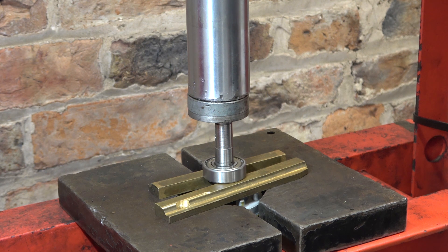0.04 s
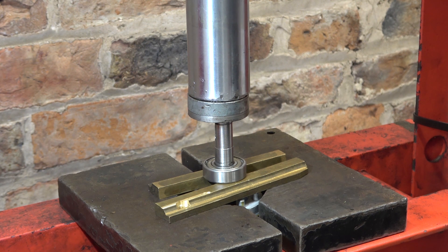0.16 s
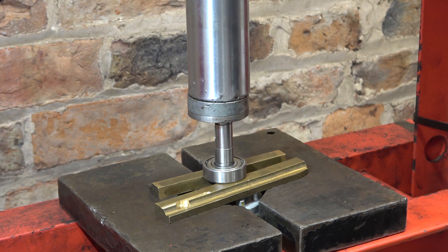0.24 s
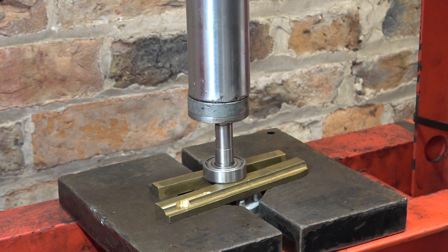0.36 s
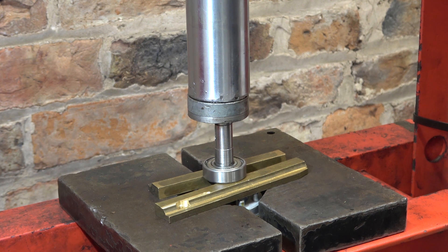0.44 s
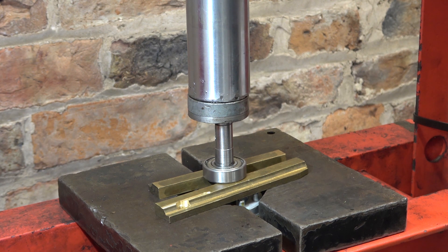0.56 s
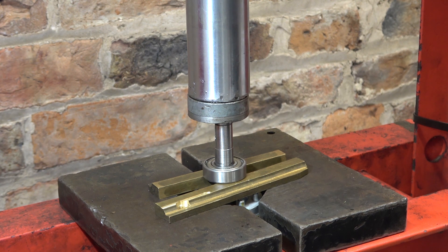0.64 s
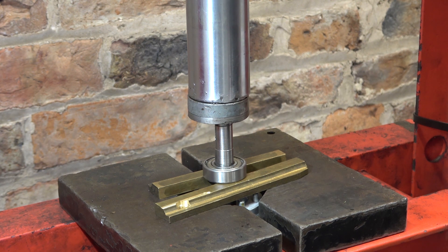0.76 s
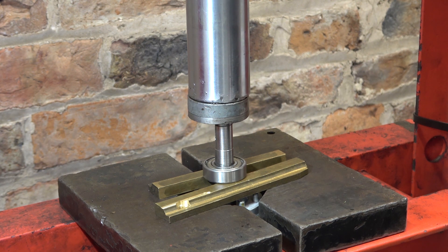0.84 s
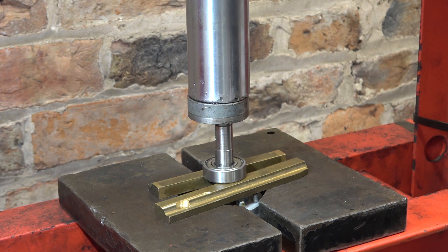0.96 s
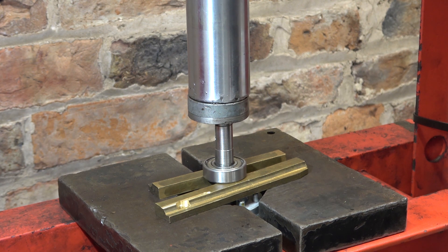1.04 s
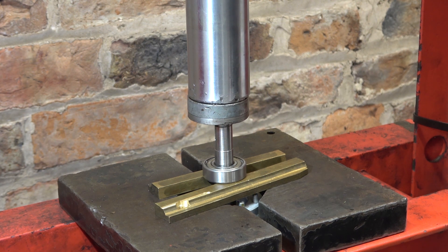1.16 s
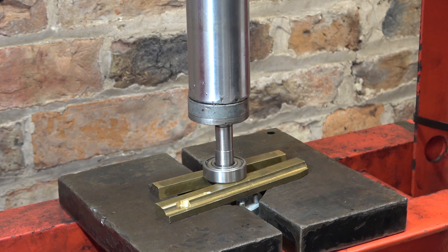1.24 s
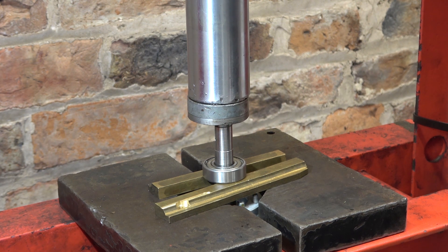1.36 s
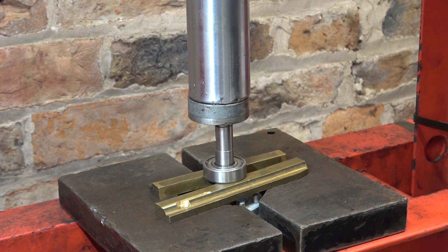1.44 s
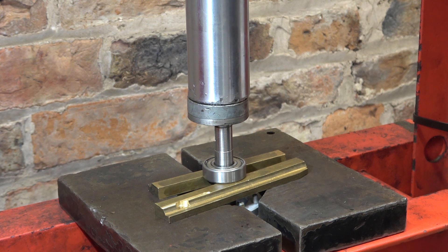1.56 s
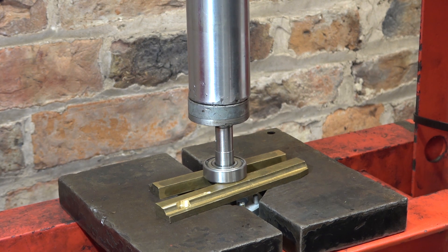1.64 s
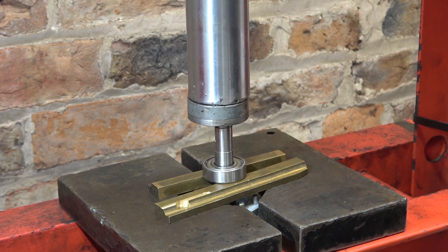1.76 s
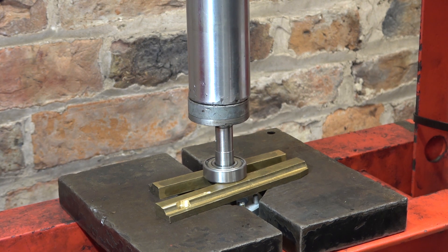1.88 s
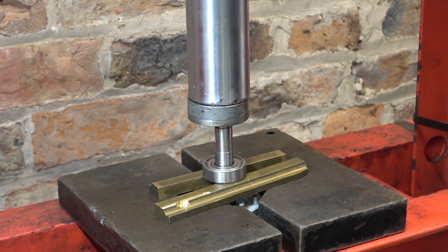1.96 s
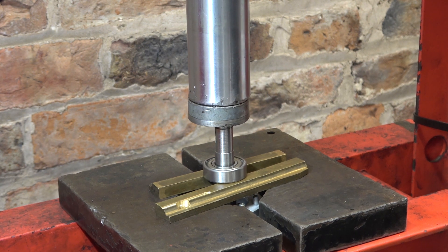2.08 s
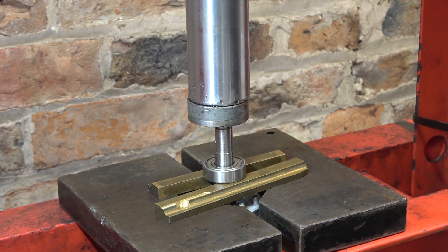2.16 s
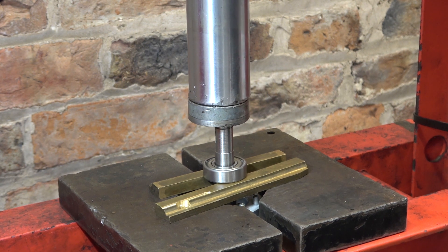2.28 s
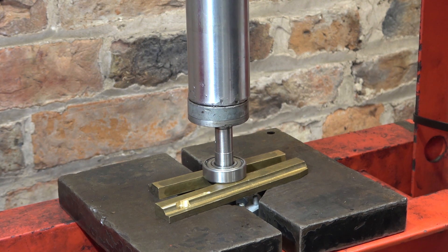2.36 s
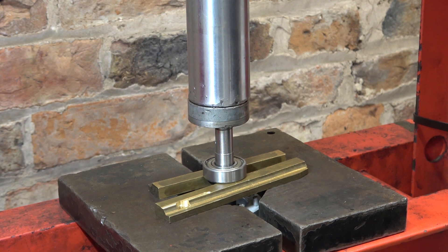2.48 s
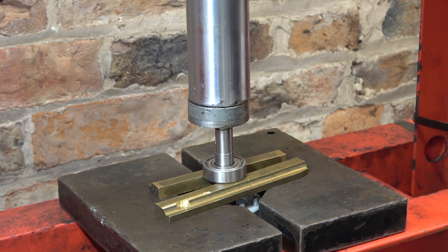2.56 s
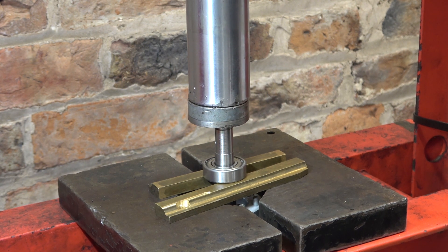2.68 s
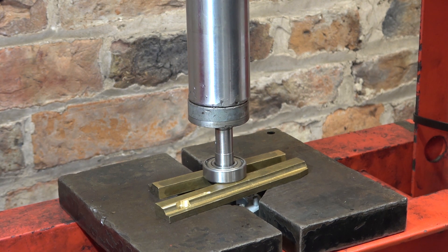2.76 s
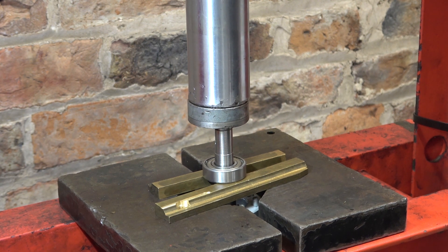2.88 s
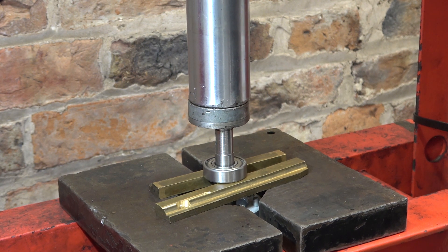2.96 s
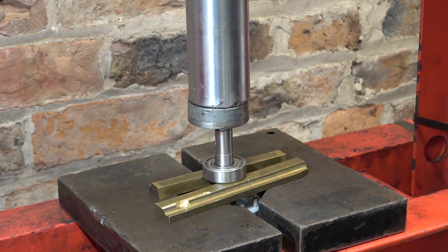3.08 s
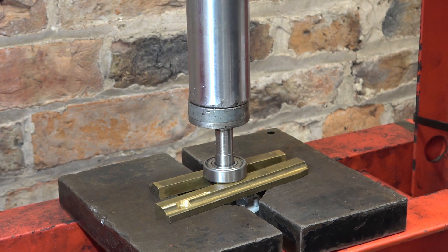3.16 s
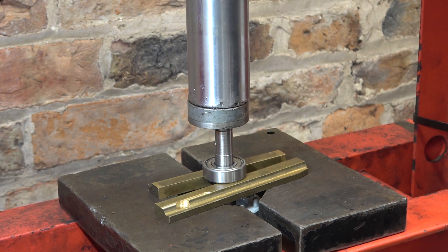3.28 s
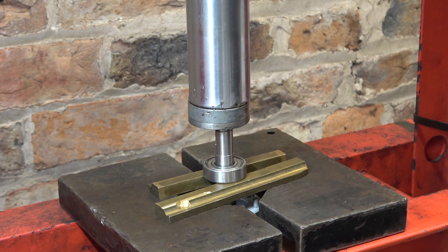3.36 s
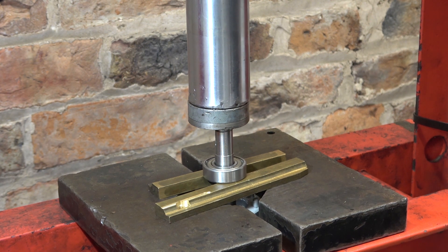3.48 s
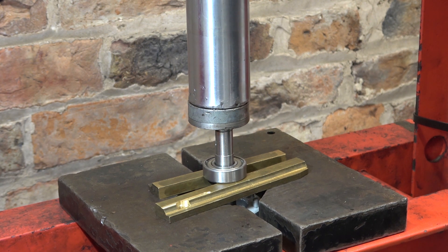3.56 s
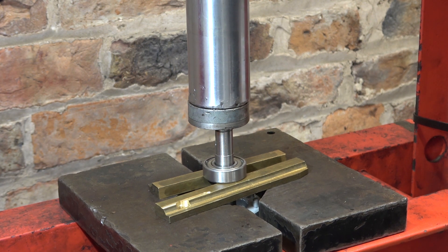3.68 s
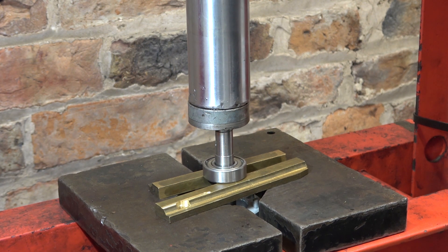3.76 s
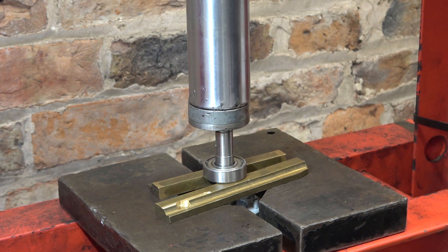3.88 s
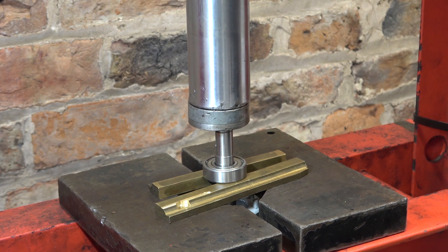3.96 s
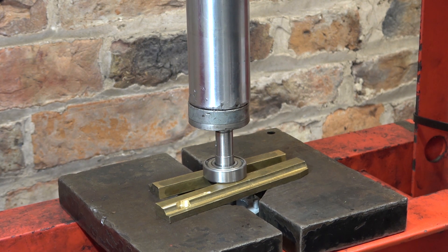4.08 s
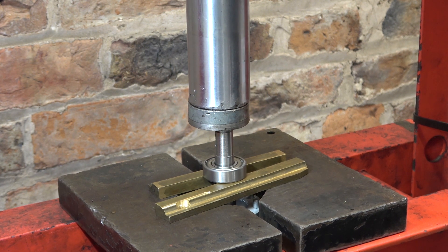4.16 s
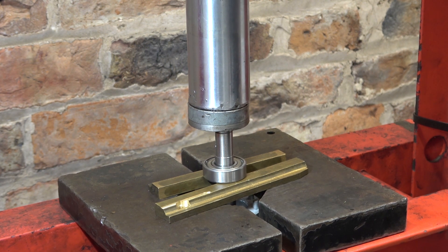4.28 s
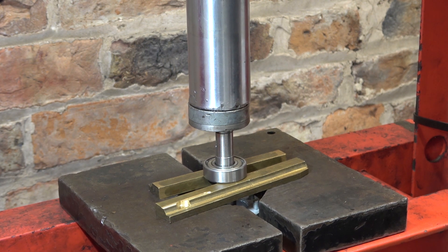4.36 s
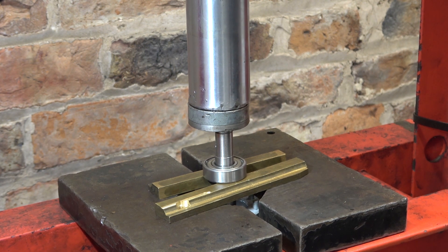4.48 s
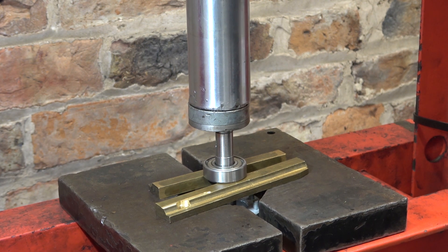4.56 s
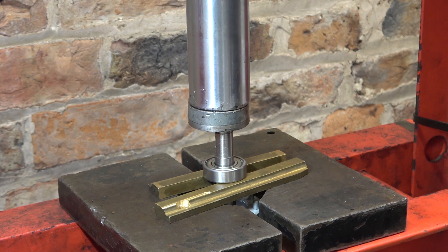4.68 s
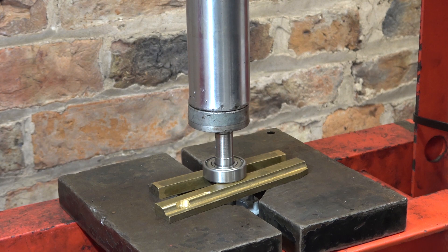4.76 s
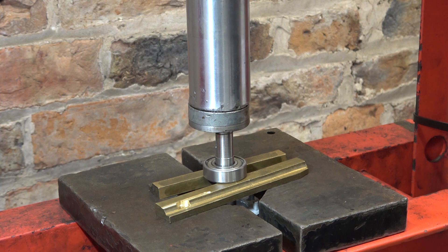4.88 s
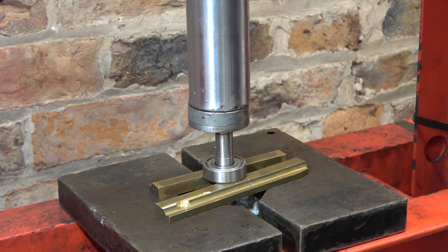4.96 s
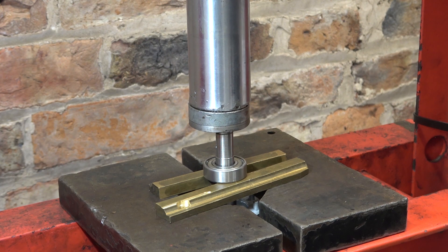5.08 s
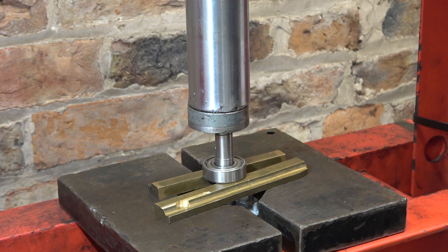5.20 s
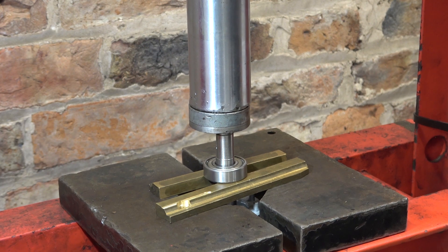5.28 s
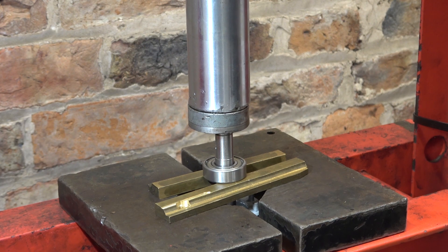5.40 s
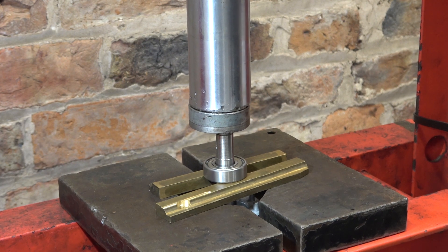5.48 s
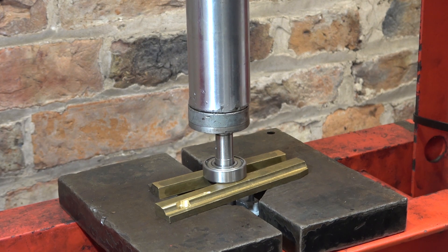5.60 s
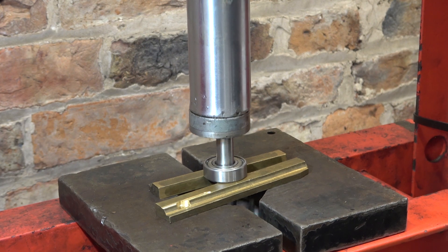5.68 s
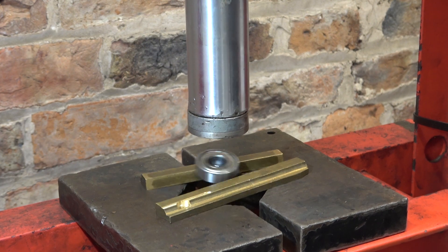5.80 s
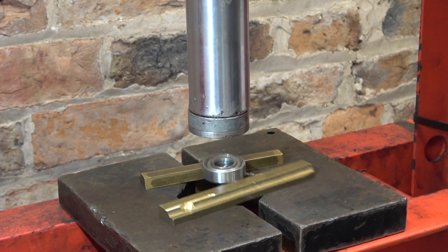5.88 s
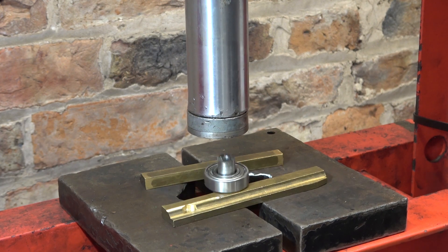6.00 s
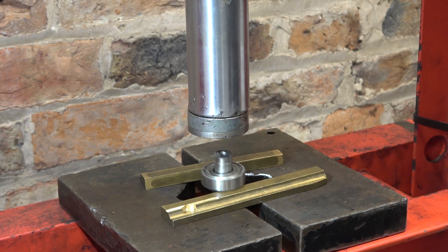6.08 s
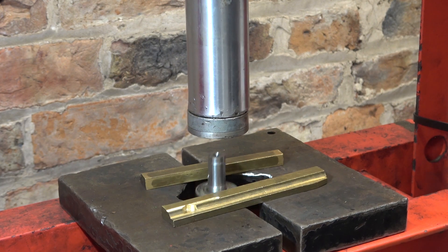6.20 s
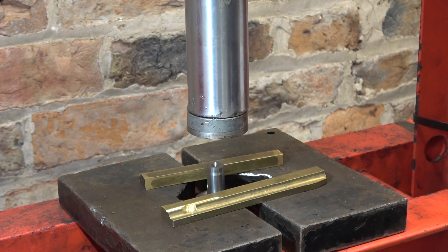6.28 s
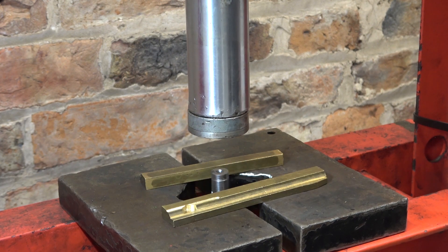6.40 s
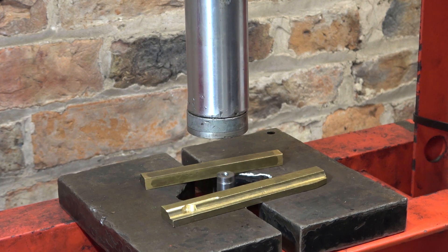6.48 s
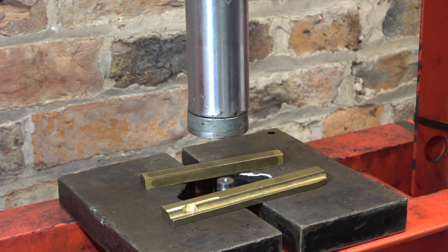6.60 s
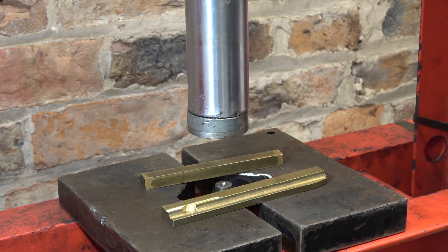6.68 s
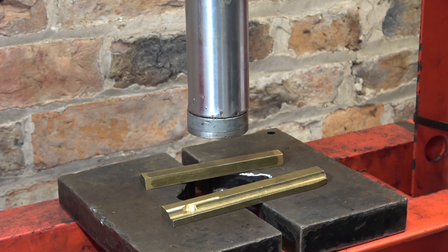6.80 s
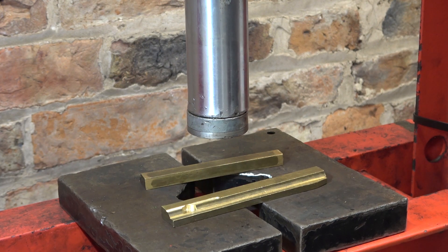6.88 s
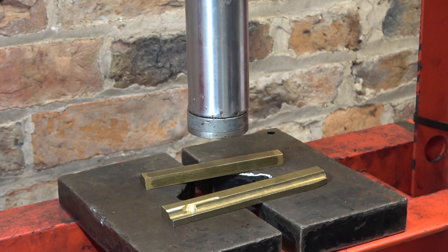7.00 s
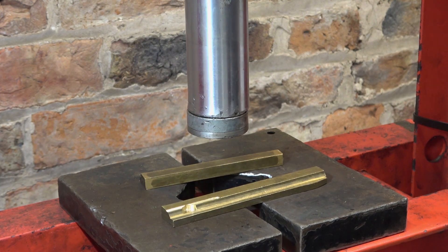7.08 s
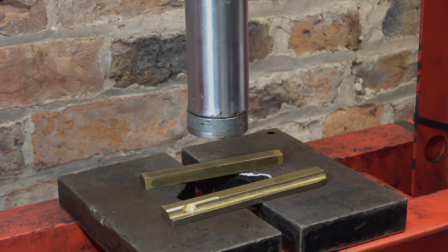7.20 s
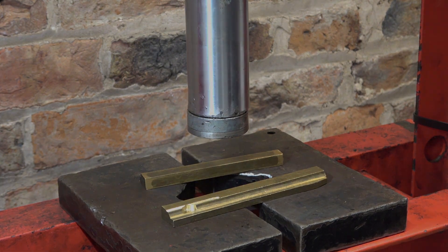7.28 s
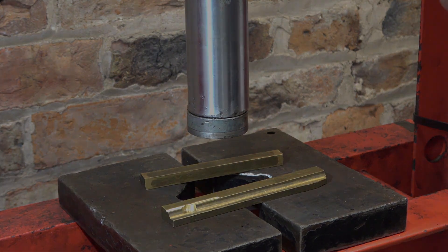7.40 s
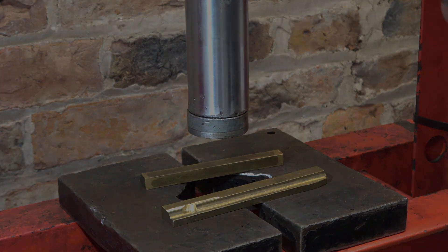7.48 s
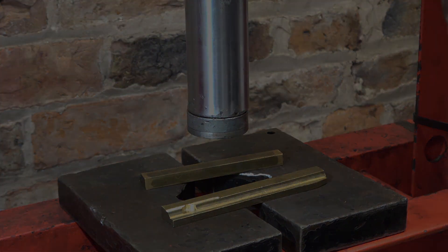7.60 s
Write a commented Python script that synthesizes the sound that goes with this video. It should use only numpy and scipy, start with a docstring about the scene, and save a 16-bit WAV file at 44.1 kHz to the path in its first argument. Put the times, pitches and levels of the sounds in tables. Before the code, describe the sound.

Near microphone, lively hard room: thirteen steady pumping strokes, each a cluster of dry metallic clicks followed by a dull frame thud, the thuds weakening while the clacks continue. Low bumps come through the floor. A sudden bang overloads the microphone, with clanging plates and a short upward-gliding ring. Light bright clinks and a hard low thump follow, then one faint tap and fading quiet.

```python
"""A hand-pumped press in a hard-walled workshop, heard by a near microphone. The lever thuds into the steel frame at
each stroke's end, over a low floor rumble; its loose linkage clacks, made of banded noise bursts and mode resonators.
Then the shaft breaks free with a crack that overloads the microphone: the bed plates ring, one mode gliding upward,
the freed bearing and falling shaft clink, the shaft lands under the bed. Decaying noise makes the room's reply
throughout; the end fades."""
import sys
import numpy as np
from scipy import signal
from scipy.fft import rfft, irfft
from scipy.io import wavfile
from scipy.ndimage import uniform_filter1d

SR = 44100
rng = np.random.default_rng(int(sys.argv[2]) if len(sys.argv) > 2 else 0)


def store_pcm(level_fs):
    """Save levels as 16-bit WAV."""
    pcm = np.round(np.clip(level_fs, -1, 1) * 32767).astype(np.int16)
    wavfile.write(sys.argv[1], SR, np.atleast_2d(pcm).T)


N = 337183  # length in samples
CRACK_S = 5.7385  # the shaft lets go


def undb(db):
    """Decibels to an amplitude factor."""
    return 10 ** (np.asarray(db) / 20)


def level(x, db):
    """Scale x to an RMS level in dB."""
    return x * undb(db) / np.sqrt(np.mean(x ** 2))


def band(x, lo_hz, hi_hz):
    """Keep the band between two frequencies."""
    return signal.sosfilt(signal.butter(2, [lo_hz, min(hi_hz, .45 * SR)], "band", fs=SR, output="sos"), x)


def colour(x, points):
    """Shape the spectrum of x by (Hz, dB) points, joined on a log frequency scale."""
    hz, db = np.transpose(points)
    f = np.maximum(np.arange(len(x) // 2 + 1) * SR / len(x), 1)
    gain = undb(np.interp(np.log(f), np.log(hz), db))
    return irfft(rfft(x) * gain, len(x))


def ring(x, modes):
    """Sum of decaying two-pole resonators driven by x."""
    out = np.zeros(len(x))
    for hz, db, t60 in modes:
        decay = np.log(1000) / (max(t60, .01) * SR)
        pole = np.exp(2j * np.pi * hz / SR - decay)
        out += undb(db) * signal.lfilter([0, pole.imag], [1, -2 * pole.real, abs(pole) ** 2], x)
    return out


def struck(x, modes, detune, spread_db):
    """One blow on loose parts: they sit differently each time, so pitch and strength of every mode scatter."""
    chance = rng.standard_normal((len(modes), 2))
    scattered = [(hz * (1 + detune * a), db + spread_db * b, t60)
                 for (hz, db, t60), (a, b) in zip(modes, chance)]
    return ring(x, scattered)


def burst(ms, rise_ms, grain_db=3):
    """Rattling contact: grainy noise that rises fast and dies with time constant ms."""
    t_ms = np.arange(8192) / SR * 1000
    shape = (1 - np.exp(-t_ms / rise_ms)) * np.exp(-t_ms / max(ms, .3))
    grain = undb(grain_db * np.repeat(rng.standard_normal(128), 64))
    x = shape * grain * rng.standard_normal(len(t_ms))
    return x * np.sqrt(np.sum(shape ** 2) / np.sum(x ** 2))


def push(ms):
    """A smooth contact force of unit impulse, ms long."""
    t_ms = np.arange(512) / SR * 1000
    force = np.sin(np.pi * np.clip(t_ms / ms, 0, 1)) ** 2
    return force / force.sum()


def add(track, s, x):
    """Lay x into the track from s seconds on."""
    i = int(s * SR)
    track[i:i + len(x)] += x[:N - i]


# The lever landing on the frame at each stroke's end. Each row: start in seconds, relative level in dB.
LANDINGS = [(0.0, -17), (0.304, -6.5), (0.731, -8.5), (1.167, -7.5), (1.589, -9.5), (2.007, -10.5),
            (2.434, -14), (2.886, -13.5), (3.322, -14.5), (3.787, -18), (4.252, -20.5), (4.721, -22.5),
            (5.192, -24)]
# Modes of the steel frame. Each row: frequency in Hz, relative level in dB, 60 dB decay time in seconds.
FRAME_MODES = [(158, -3, 0.12), (272, -11, .07), (293, -2, 0.11), (430, -0.5, 0.04), (633, 10.5, 0.017),
               (720, -4, 0.03), (962, -16.5, 0.045)]
CHATTER_MS, CHATTER_SCATTER_MS, CHATTER_DB = 4.1, 0.47, -2.5


def lever_landings():
    """The landing lever chatters four times on its stop, driving the frame's modes, with a dull thud of noise."""
    thud, into_frame = np.zeros((2, N))
    for s, db in LANDINGS:
        for k, jitter in enumerate(rng.uniform(-1.1, 1, size=4)):
            late_ms = max(k * CHATTER_MS + jitter * CHATTER_SCATTER_MS, 0)
            add(into_frame, s + late_ms / 1000, undb(db + CHATTER_DB) * push(0.88))
        add(thud, s, undb(db + 5.5) * band(burst(19, 2.7), 290, 1100))
    return thud + undb(-8.0) * band(ring(into_frame, FRAME_MODES), 100, 2700)


# How long the hard walls hold the sound. Each row: frequency in Hz, 60 dB decay time in seconds.
ROOM_DECAY = [(60, 0.45), (300, 0.66), (1000, 0.99), (3000, 0.91), (7000, 0.39), (10000, 0.17),
              (14000, 0.1)]


def room(x):
    """Dense reflections: noise in half-octave bands, each dying at its own rate."""
    t = np.arange(SR) / SR
    hz, t60 = np.transpose(ROOM_DECAY)
    tail = np.zeros(SR)
    for f in 45 * 2 ** np.arange(0, 9, .5):
        band_t60 = np.interp(np.log(f), np.log(hz), t60)
        tail += band(rng.standard_normal(SR), f / 2 ** .25, f * 2 ** .25) * undb(-60 * t / band_t60)
    tail *= 1 - np.exp(-t / 0.0044)  # reflections build up over the first milliseconds
    return signal.fftconvolve(x, tail / np.sqrt(np.sum(tail ** 2)))[:N]


# The press rocking on the floor while pumped. Each row: time in seconds, relative level in dB.
RUMBLE_LEVEL = [(0.0, -60), (1.08, -51), (6.012, -49.5), (6.5, -65.5)]
# Dull bumps through the floor. Each row: start in seconds, level in dB, starting pitch in Hz, length in cycles.
FLOOR_BUMPS = [(1.012, -31, 46, 1.6), (1.392, -22, 135, 2.6), (1.428, -24.5, 135, 3.3),
               (2.32, -26, 63, 1.35), (3.214, -21, 150, 4.5), (3.67, -27, 54, 1.4), (4.496, -29, 48, 1.7),
               (4.955, -30, 41.6, 1.6), (5.468, -30.5, 66, 2)]
BUMP_SAG = 0.23  # sets how fast the pitch falls with each cycle


def floor_borne():
    """Short low sine bumps that sag in pitch, over an uneven rumble of low noise."""
    s, db = np.transpose(RUMBLE_LEVEL)
    steps = np.repeat(rng.standard_normal(N // 2048 + 1), 2048)[:N]
    sway_db = 4 * uniform_filter1d(steps, 2048)
    gain = undb(np.interp(np.arange(N) / SR, s, db, right=-90) + sway_db)
    out = gain * level(band(rng.standard_normal(N), 35, 78), 1.5)
    for s, db, hz, cycles in FLOOR_BUMPS:
        turn = np.log1p(BUMP_SAG * hz * np.arange(8192) / SR) / BUMP_SAG  # cycles gone by
        shape = np.sin(np.pi * np.clip(turn / cycles, 0, 1)) ** 2
        add(out, s, undb(db) * np.sin(2 * np.pi * turn) * shape)
    return out


# Spectrum of the quiet workshop. Each row: frequency in Hz, relative gain in dB.
QUIET_COLOUR = [(15, -25.5), (25, 1.5), (50, -1), (74, -7.5), (137, 0.5), (165, -8), (316, 0), (342, -8.5),
                (486, -10), (1090, -16.5), (15800, -23.5)]


def quiet_background():
    """Steady faint noise under everything, shaped by its spectrum."""
    return level(colour(rng.standard_normal(N), QUIET_COLOUR), -55)


# Modes of the loose linkage. Each row: nominal frequency in Hz, relative level in dB, 60 dB decay in seconds.
LINKAGE_MODES = [(2070, -3, .05), (2930, 0, .08), (3700, -3, .06), (4640, 0, .035), (6100, -8, .05),
                 (9150, -12, .09)]
# Modes of the stand. Each row: nominal frequency in Hz, relative level in dB, 60 dB decay in seconds.
STAND_MODES = [(124, -14.5, 0.36), (202.2, -13.5, 0.36), (267, -11, 0.11), (478.3, -7, 0.22),
               (815, -11, 0.072), (1010, -15.5, 0.071)]
RATTLE_RISE_MS = 2.5


def contacts(events, stand_db, treble_db, top_db, crackle_db, rattle_ms):
    """Each clack is a rattling noise burst around its resonance that rings the linkage and nudges the stand."""
    out = np.zeros(N)
    for s, db, hz, bright_db in events:
        s -= RATTLE_RISE_MS / 1000  # the rattle starts before its peak
        hit = undb(db) * burst(rattle_ms, RATTLE_RISE_MS)
        body = undb(-2) * band(hit, .55 * hz, 1.9 * hz) + undb(1.5) * band(hit, .86 * hz, 1.16 * hz)
        add(out, s, body)
        add(out, s, undb(treble_db + bright_db) * band(hit, 4300, 5600))
        top = band(burst(0.22 * rattle_ms, 1.0), 9500, 16000)
        add(out, s + .001, undb(top_db + bright_db + db) * top)
        crackle = band(burst(32, 1.6), 4500, 8500)  # loose pins crackle on
        add(out, s, undb(crackle_db + bright_db + db) * crackle)
        jangle = band(burst(19, 3.5, 6.9), 1400, 3000)  # the joints jangle after the hit
        add(out, s, undb(db + 1.5) * jangle)
        add(out, s, undb(-45) * struck(hit, LINKAGE_MODES, detune=.015, spread_db=2.5))
        nudge = undb(stand_db) * np.pad(hit, (0, 4096))  # leaves time for the stand to ring
        stand = struck(nudge, STAND_MODES, detune=.011, spread_db=2.5)
        add(out, s, undb(11.0) * band(nudge, 200, 1100) + undb(-27.5) * stand)
    return out


# The rising lever brushes its upper stop.
# Each row: peak time in seconds, relative level in dB, contact resonance in Hz, brightness in dB.
BRUSHES = [(0.0169, -28, 4240, -1), (0.4364, -22, 4160, 22.5), (0.8784, -29.5, 4370, -5),
           (1.3164, -22.5, 2050, -5), (1.7574, -36, 2030, 0), (2.154, -22, 1580, 13),
           (3.036, -19.5, 1370, 8), (3.489, -26.5, 1440, 1), (3.9469, -32, 1630, 14),
           (4.4148, -30.5, 2080, -0.5), (4.8998, -27, 2090, 5), (5.3669, -29.5, 4500, -1)]
# It bangs against that stop. Each row: peak time in seconds, relative level in dB, resonance in Hz, brightness in dB.
STOPS = [(0.0383, -19.5, 1670, -18), (0.4544, -19, 1930, 4), (0.8962, -23, 2040, 0),
         (1.3294, -17.5, 2030, 5), (1.7431, -16.5, 1550, 15), (2.1707, -16.5, 2670, 1.5),
         (2.5865, -13, 2250, 7.5), (3.0568, -17.5, 2250, -1), (3.5062, -20.5, 2140, 4.5),
         (3.9669, -20, 1490, 4), (4.4395, -21.5, 3020, -8), (4.9244, -23, 2170, -9),
         (5.3792, -24.5, 1570, -3)]
# Slack in the pins is taken up as the lever starts down.
# Each row: peak time in seconds, relative level in dB, resonance in Hz, brightness in dB.
SLACKS = [(0.1737, -26.5, 3400, 16), (0.5885, -34, 2440, -4), (1.042, -24.5, 4070, -13),
          (1.4691, -23.5, 2670, -10), (1.4844, -24, 2760, -6), (1.8906, -24.5, 3220, -4),
          (2.3411, -36, 2970, 2), (2.3654, -40, 2980, 4), (2.768, -30.5, 3220, 1), (2.816, -34, 3650, 0),
          (3.1984, -28.5, 2880, -5), (3.2186, -34.5, 4450, -3), (3.6878, -29.5, 2870, 1),
          (3.7237, -36, 3360, 8), (4.1397, -24.5, 2970, 10), (4.1544, -27, 2600, -3),
          (4.6555, -36, 3180, 1), (5.0808, -24, 3960, 2), (5.5385, -30.5, 2900, -1),
          (5.5922, -32.5, 2940, 10)]
# The link catches. Each row: peak time in seconds, relative level in dB, resonance in Hz, brightness in dB.
CATCHES = [(0.2435, -24.5, 2570, 1), (0.6679, -25.5, 3320, 8), (1.1081, -19.5, 2950, 4),
           (1.538, -23, 1900, 3), (1.9531, -22.5, 2500, 1), (2.3823, -24, 4340, 2), (2.8337, -22, 3170, 7),
           (3.268, -25.5, 4330, -11), (3.7382, -25.5, 4240, 5), (4.1987, -24, 4160, 4),
           (4.6722, -25.5, 4400, -5), (5.1366, -21, 2220, 7), (5.6083, -24.5, 4400, 4)]
# Clacks around the lever's downstroke, most of them just before a thud.
# Each row: peak time in seconds, relative level in dB, resonance in Hz, brightness in dB.
DOWNSTROKES = [(0.2843, -14, 1930, 2), (0.708, -19.5, 2240, -3), (1.1408, -18.5, 2980, -6),
               (1.573, -15.5, 2330, 2), (1.9888, -17.5, 2600, 2), (2.4144, -16.5, 2980, 1),
               (2.8679, -18, 2400, -10), (3.3056, -13, 1880, 3), (3.7721, -14.5, 3370, 11),
               (4.2397, -16.5, 1640, -5), (4.2754, -38, 2850, -1), (4.7112, -16, 3080, 10),
               (5.1758, -18.5, 1860, 7), (5.6449, -14, 3350, -2), (5.677, -31, 2770, 6)]


def pump_linkage():
    """The five kinds of clack in the pumping, each with its own share of stand, treble, top and crackle."""
    brush = contacts(BRUSHES, stand_db=1, treble_db=-13, top_db=-36, crackle_db=-29, rattle_ms=15)
    stop = contacts(STOPS, stand_db=-5.3, treble_db=-10, top_db=-13, crackle_db=-21, rattle_ms=11.4)
    slack = contacts(SLACKS, stand_db=-1, treble_db=-19, top_db=-27, crackle_db=-32, rattle_ms=11)
    catch = contacts(CATCHES, stand_db=-6.5, treble_db=-15.5, top_db=-10, crackle_db=-27.5, rattle_ms=10)
    down = contacts(DOWNSTROKES, stand_db=-4.5, treble_db=-23.5, top_db=-36.5, crackle_db=-34, rattle_ms=16.8)
    return brush + stop + slack + catch + down


def stray_ticks():
    """Loose pins tick at random moments before the crack, as short noise bursts."""
    out = np.zeros(N)
    for when, size in rng.random((40, 2)):
        add(out, when * CRACK_S, undb(-33 + 9 * size) * band(burst(4, 1), 1800, 3800))
    return out


# Spectrum of the crack. Each row: frequency in Hz, relative gain in dB.
CRACK_SPECTRUM = [(24, -27), (40, -16.5), (359, -2.5), (621, -0.5), (881, 0), (1700, -10), (2510, -12),
                  (4130, -8.5), (5170, -16), (7340, -29.5), (15500, -43)]
# Modes of the bed plates. Each row: frequency in Hz, relative level in dB, 60 dB decay time in seconds.
PLATE_MODES = [(295, -6, 0.21), (448, -12, 0.24), (484, -19.5, .25), (785.5, -10.5, .2), (864, -9, 0.26),
               (1266.6, -14.5, 0.41), (3150, -23.5, 0.63), (3820, -25, 0.64)]


def release():
    """The shaft lets go: a broad noise crack, rattling parts, and a short push that sets the bed plates ringing."""
    crack, knock = np.zeros((2, N))
    hit = colour(burst(8, 5.3), CRACK_SPECTRUM)
    add(crack, CRACK_S, undb(7) * hit / np.abs(hit).max())  # peaks above full scale
    add(crack, CRACK_S, undb(-26.5) * band(burst(70, 8.4, 3.9), 5400, 11000))  # loose parts chatter
    add(crack, CRACK_S, undb(2.5) * band(burst(30, 6), 77, 420))  # the frame jolts on the floor
    add(knock, CRACK_S + .003, push(.25))
    return crack + ring(knock, PLATE_MODES)


# The plates rocking on the bed. Each row: start in seconds, length in seconds, level in dB, starting pitch in Hz.
PLATE_ROCKS = [(5.749, 0.11, -0.5, 680), (5.869, 0.092, -16, 672), (5.959, 0.091, -26, 669),
               (6.042, 0.095, -29.5, 668)]
ROCK_ATTACK_S, ROCK_RELEASE_S, ROCK_DECAY_DB_S, ROCK_CLIMB_HZ_S = 0.015, 0.021, 87.5, 380


def plate_ring():
    """The strongest plate mode, a sine that swells and climbs on each rock and is damped as the plate settles."""
    out = np.zeros(N)
    for s, length, db, hz in PLATE_ROCKS:
        t = np.arange(int(length * SR)) / SR
        shape = np.clip(t / ROCK_ATTACK_S, 0, 1) * np.clip((length - t) / ROCK_RELEASE_S, 0, 1)
        tone = np.sin(2 * np.pi * t * (hz + .5 * ROCK_CLIMB_HZ_S * t))
        add(out, s, shape * undb(db - ROCK_DECAY_DB_S * t) * tone)
    return out


# Light metallic clinks of the freed bearing and the falling shaft.
# Each row: start in seconds, relative level in dB, contact resonance in Hz, share of ringing in dB.
CLINKS = [(5.782, -30, 9800, -21), (5.908, -18.5, 5760, -21.5), (5.965, -33, 9700, -45),
          (5.976, -29, 9250, -38), (6.014, -28.5, 5960, -37), (6.029, -36, 8950, -29),
          (6.097, -25.5, 6000, -34), (6.122, -27, 3300, -31), (6.196, -24, 2890, -44),
          (6.253, -25.5, 6030, -52)]
# Modes that ring after each clink. Each row: frequency in Hz, relative level in dB, 60 dB decay time in seconds.
CLINK_MODES = [(4530, -9, 0.11), (7550, -10, 0.5), (8200, -4, 0.13), (10460, -16.5, 0.12),
               (13000, -19, .12), (13440, -9, .17)]


def bearing_and_shaft_clinks():
    """Light taps of noise around a contact resonance; the ringing of each stops at the next clink."""
    out = np.zeros(N)
    stops = [row[0] for row in CLINKS[1:]] + [CLINKS[-1][0] + .09]
    for (s, db, hz, ring_db), stop in zip(CLINKS, stops):
        hit = undb(db) * burst(3.25, 0.76)
        still_ringing = np.arange(len(hit)) < (stop - s) * SR
        clink = band(hit, 0.34 * hz, 1.66 * hz) + undb(7.5) * band(hit, .96 * hz, 1.04 * hz)
        ringing = still_ringing * ring(band(hit, 0.23 * hz, 1.9 * hz), CLINK_MODES)
        add(out, s, clink + undb(ring_db) * ringing)
    return out


# The freed shaft landing under the bed. Each row: start in seconds, relative level in dB.
SHAFT_LANDINGS = [(6.122, 1), (6.6, -29.5)]
# Modes of the shaft. Each row: frequency in Hz, relative level in dB, 60 dB decay time in seconds.
SHAFT_MODES = [(3020, -6.5, 0.37), (3540, -0.5, .12), (3710, -7, 0.56)]


def shaft_drop():
    """Each landing is a low double-banded thump, with a fainter clatter that rings the shaft."""
    out = np.zeros(N)
    for s, db in SHAFT_LANDINGS:
        thump = band(burst(13.3, 3.0), 580, 880) + undb(-1.5) * band(burst(11, 3.4), 120, 480)
        add(out, s, undb(db) * thump)
        clatter = band(burst(14.2, 3.2, 4.1), 1100, 3800)
        add(out, s, undb(db - 22) * (clatter + undb(-36.5) * ring(clatter, SHAFT_MODES)))
    return out


def scene():
    """The press and its freed parts, the room's answer, the floor and the quiet workshop, in two channels."""
    pumping = lever_landings() + pump_linkage() + stray_ticks()
    near = pumping + release() + bearing_and_shaft_clinks() + shaft_drop()
    ringing = plate_ring()
    # the strongest plate mode is heard mostly direct, with little room reply
    reflections = undb(-10) * room(near + undb(-14) * ringing)
    mid = near + ringing + reflections + floor_borne() + quiet_background()
    side = undb(-38) * mid  # the left is a touch softer
    return np.array([mid - side, mid + side])


FADE_S, FADE_END_DB, FADE_BEND = 6.24, -9, 2.34


def record(dry):
    """The microphone input clips at full scale, the top is cut, the end fades by 9 dB."""
    progress = np.clip((np.arange(N) / SR - FADE_S) / (N / SR - FADE_S), 0, 1)
    fade = undb(FADE_END_DB * progress ** FADE_BEND)
    top_cut = signal.ellip(10, .2, 90, 15900, fs=SR, output="sos")  # low-pass edge in Hz
    return fade * signal.sosfilt(top_cut, np.clip(dry, -1, 1))


dry = scene()
out = record(dry)
store_pcm(out)
```